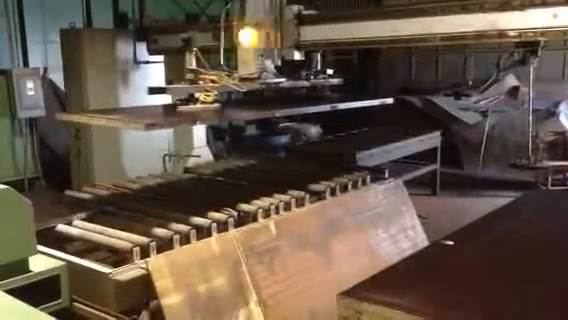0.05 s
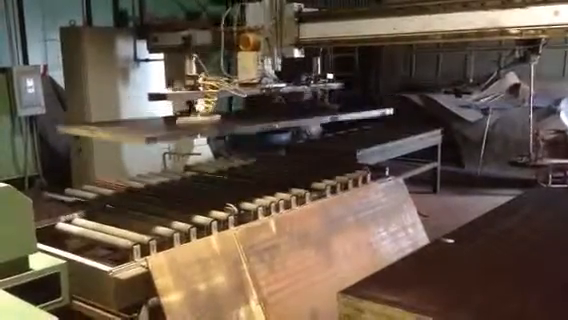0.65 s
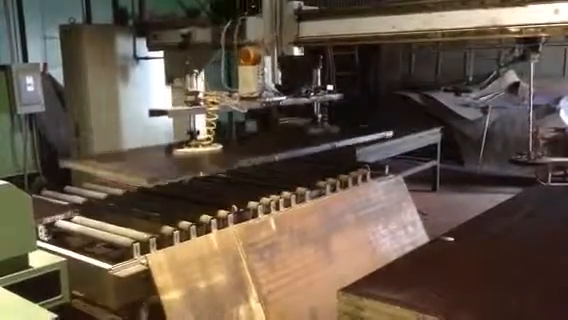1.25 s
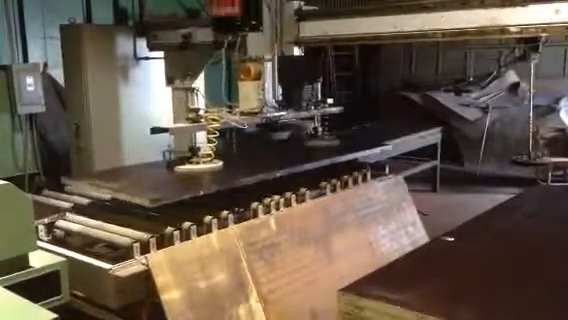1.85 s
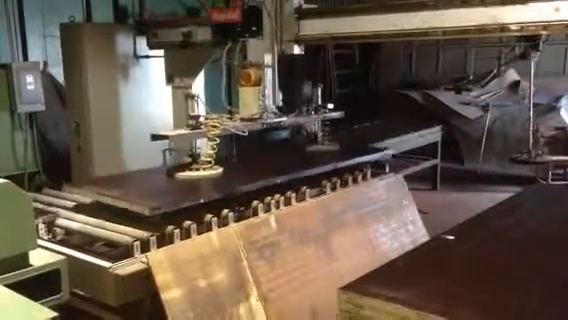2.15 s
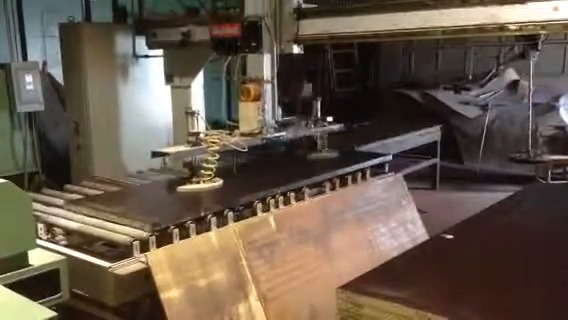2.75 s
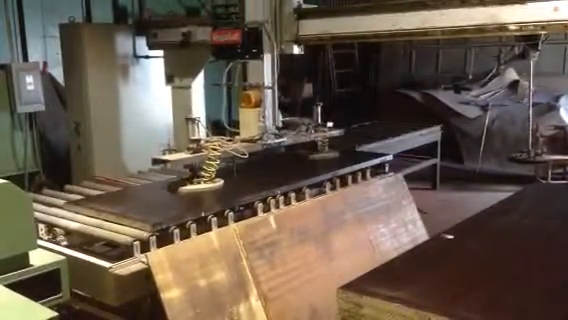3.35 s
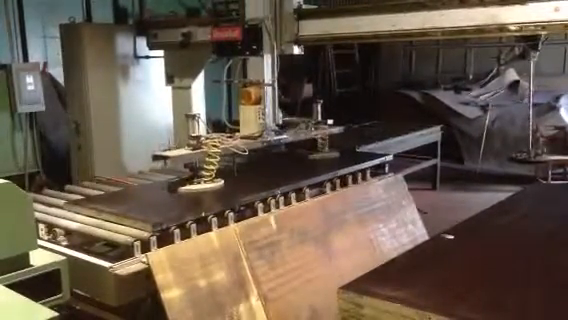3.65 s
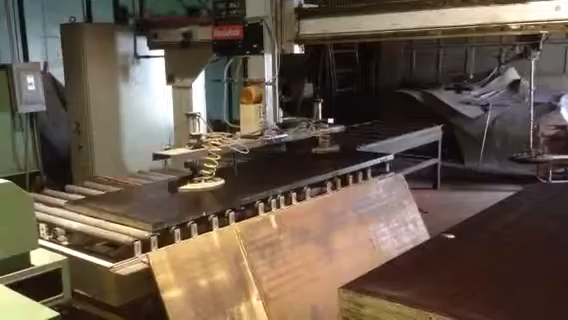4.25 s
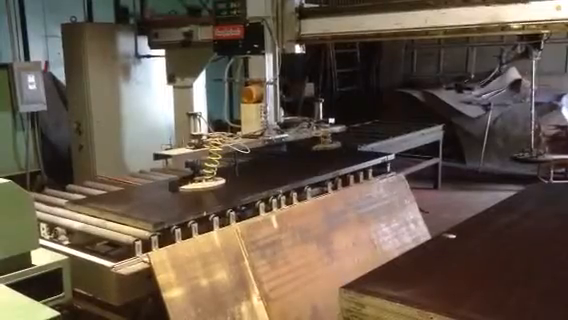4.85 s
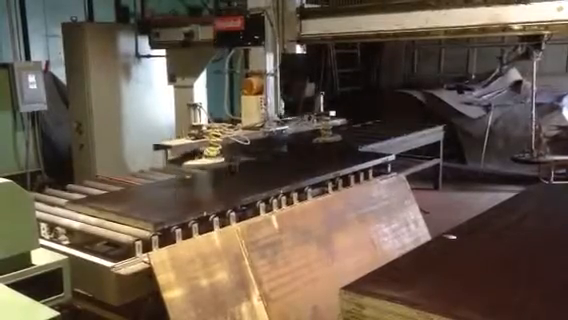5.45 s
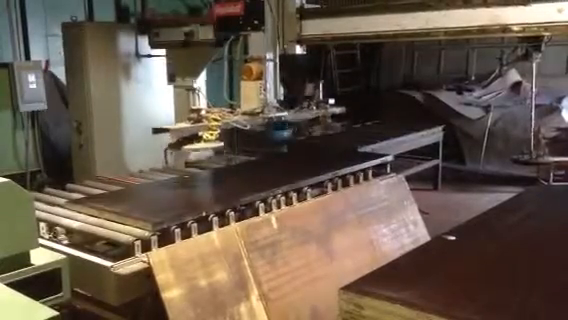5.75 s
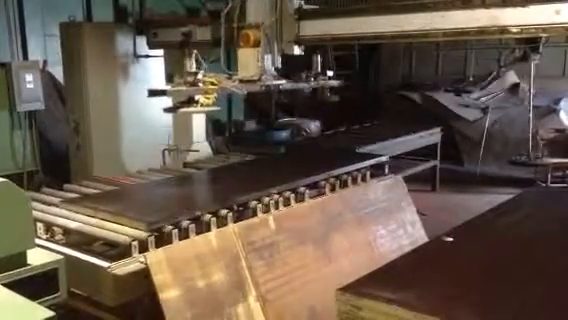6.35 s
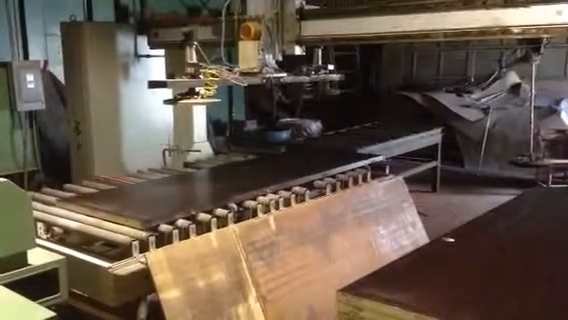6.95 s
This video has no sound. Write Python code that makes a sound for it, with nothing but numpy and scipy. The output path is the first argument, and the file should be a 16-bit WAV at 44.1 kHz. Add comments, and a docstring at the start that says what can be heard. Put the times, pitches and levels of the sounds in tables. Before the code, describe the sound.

A steady, bright hiss of compressed air from a vacuum lifter fills a factory hall, with motors and fans humming behind it. From 0.3 to 0.6 seconds valves spurt and the hiss surges, and the carriage starts rubbing downward. Around 0.9 seconds come another spurt, a thin metal squeak and a quick clatter. Soft knocks between 2.6 and 2.9 seconds mark a panel settling on a roller table. At about 4 seconds the hiss gives way to escaping air, which turns louder and brighter at 4.2 seconds, with hollow, sputtering whistles hopping in pitch. It ends in a sharp spurt and shuts off at 5.2 seconds, ringing in the hall for about a second. Machine hum remains while the carriage rises with a quiet rattle, a faint squeak at 6 seconds and small knocks. One microphone hears the knocks almost dry, its level dipping under each blast.

```python
"""A steady hiss of compressed air fills a factory hall, with motors and fans humming behind it.
It is the ejector of a vacuum lifter, which lowers a panel onto a roller table with knocks and squeaks.
The suction is released: air blows off and whistles through the cups, shuts off, and the carriage rises.
One microphone hears the knocks almost dry and the air with the hall ringing after it.
The recorder's gain control ducks under each blast and creeps back."""
import sys
import numpy as np
from scipy import signal
from scipy.fft import rfft, irfft
from scipy.io import wavfile
from scipy.ndimage import uniform_filter1d

SR = 44100
rng = np.random.default_rng(int(sys.argv[2]) if len(sys.argv) > 2 else 0)


def materialize(psi):
    """Save the field psi as 16-bit PCM at rate SR to the path in sys.argv[1].

    A 1-D psi becomes a single channel; in a 2-D psi each row is a channel.
    """
    bounded = np.clip(np.atleast_2d(psi).T, -1, 1)
    quanta = np.round(bounded * 32767).astype(np.int16)
    wavfile.write(sys.argv[1], SR, quanta)


N = 317520
TIME = np.arange(N) / SR
CUTOFF_HZ = 15280


def from_db(db):
    """Decibels to gain."""
    return 10 ** (np.asarray(db) / 20)


def rms_one(x):
    """Scale to unit power."""
    return x / np.sqrt(np.mean(x ** 2) + 1e-20)


def at_hz(points, hz):
    """Read a table along a log-frequency axis."""
    known_hz, values = np.transpose(points)
    return np.interp(np.log(hz + 1), np.log(known_hz), values)


def filtered(x, response):
    """Pass x through a gain given as a function of frequency."""
    return irfft(rfft(x) * response(np.fft.rfftfreq(len(x), 1 / SR)), len(x))


def drift(rate_hz):
    """Random wandering of spread 1, mostly slower than the rate."""
    return rms_one(filtered(rng.standard_normal(N), lambda hz: 1 / (1 + (hz / rate_hz) ** 2)))


def noise(spectrum, peaks=()):
    """Turbulence with a broad colour and narrow resonances on top; rms 1."""
    def colour(hz):
        resonances = sum(from_db(db) ** 2 / (1 + (2 * (hz - centre) / width) ** 2)
                         for centre, width, db in peaks)
        return from_db(at_hz(spectrum, hz)) * np.sqrt(1 + resonances) * (hz < CUTOFF_HZ)
    return rms_one(filtered(rng.standard_normal(N), colour))


def airy_tone(hz, width_hz):
    """Turbulence in one narrow resonance, whose pitch may move; rms 1."""
    turbulence = drift(width_hz) + 1j * drift(width_hz)
    return np.real(turbulence * np.exp(2j * np.pi * np.cumsum(hz * np.ones(N)) / SR))


def envelope(start, end, rise_s, fall_s):
    """Rise from the start, hold until the end, then fall to nothing."""
    return np.clip((TIME - start) / rise_s, 0, 1) * np.clip(1 - (TIME - end) / fall_s, 0, 1)


def arch(start, length):
    """Swell and fade in one half sine."""
    return np.sin(np.pi * np.clip((TIME - start) / length, 0, 1))


def ejector(level_db=-13, release_at=3.975, bleed_s=0.029, waver_db=0.64):
    """The venturi jet hisses through its silencer until the release, then its line bleeds empty."""
    # Colour of the hiss. Each row: frequency in Hz, level in dB.
    spectrum = [(300, -38), (950, -19.5), (1500, -11.5), (2100, -3.5), (2900, -4.5), (3350, -3),
                (3700, -0.5), (4400, 0.05), (5500, 1.6), (5780, -2.5), (7000, -5), (7700, -5.5),
                (10400, -5.5), (11300, -8.5), (12400, -7), (15200, -8)]
    # Its resonances. Each row: centre in Hz, width in Hz, level in dB against the hiss.
    peaks = [(2120, 220, -1.5), (3700, 240, -10), (5380, 300, -7)]
    # Jumps in supply pressure. Each row: start and end in seconds, gain in dB, rise in seconds.
    surges = [(0.297, 0.663, 2.5, 0.09), (0.32, 0.36, 2.5, 0.025), (0.397, 0.49, 3.5, 0.025),
              (3.941, 3.979, 5, 0.014)]
    # Thin bands that slide as the lifter moves. Each row: start and length in seconds,
    # first and last pitch in Hz, level in dB against the hiss.
    slides = [(0, .55, 5400, 5350, -19), (.95, 0.9, 5530, 5250, -19), (1.0, 1.1, 3710, 3680, -27),
              (1.85, 1.2, 5170, 5700, -19), (2.95, .95, 3890, 3700, -17.5), (3.05, 1.0, 5540, 5250, -17.5)]
    supply = np.exp(-np.maximum(TIME - release_at, 0) / bleed_s)
    surge_db = sum(db * envelope(start, end, rise, fall_s=0.025) for start, end, db, rise in surges)
    bands = np.zeros(N)
    for start, length, from_hz, to_hz, db in slides:
        pitch_hz = np.interp(TIME, [start, start + length], [from_hz, to_hz])
        bands += from_db(db) * arch(start, length) * airy_tone(pitch_hz, width_hz=63)
    gain = supply * from_db(level_db + surge_db + waver_db * drift(rate_hz=7))
    return gain * (noise(spectrum, peaks) + bands)


def machines(rumble_db=-29, whirr_db=-29.5, waver_hz=2.33, waver_db=2.5):
    """Motors and fans around the hall: booming rumble, whirr and wavering tones."""
    # Colours of the rumble and the whirr. Each row: frequency in Hz, level in dB.
    rumble = [(22, -52), (50, -59), (95, -25), (125, -6), (175, 0), (300, -1), (380, -3), (450, -13.5),
              (800, -38)]
    whirr = [(240, -20.5), (400, -12), (432, -11), (465, -1), (621, -1.5), (690, -5.5), (791, -6),
             (994, -8.5), (1910, -6), (2920, -12), (5190, -12.5), (6610, -17), (15000, -28)]
    # Booming resonances. Each row: centre in Hz, width in Hz, level in dB against the rumble.
    booms = [(171, 30, -2), (208, 23, 2), (245.6, 7.2, 0.5), (305.7, 12.4, 3.5)]
    # Motor tones. Each row: pitch in Hz, level in dB.
    hum = [(473, -43.5), (635, -47.5), (808, -48.5), (932, -49.5), (1270, -52), (8000, -55)]
    out = from_db(rumble_db) * noise(rumble, booms) + from_db(whirr_db) * noise(whirr)
    for hz, db in hum:
        phase = 2 * np.pi * np.cumsum(hz + waver_hz * drift(rate_hz=5.6)) / SR
        out += np.sqrt(2) * from_db(db + waver_db * drift(rate_hz=5.4)) * np.sin(phase)
    return out


def blow_off(leak_hz=1400, treble_hz=10500, leak_share=0.64, swell_db_per_s=4.5, flutter_db=0.6):
    """Air escapes around the cups: low and dull while they sit on the panel, bright once they lift."""
    # Colour of the escaping air. Each row: frequency in Hz, level in dB.
    spectrum = [(300, -40), (900, -21.5), (1400, -12.5), (2100, 0), (2700, -2.5), (3500, -5), (4800, -4),
                (6000, -3), (7200, -2.5), (8500, -4), (10000, -4.5), (11300, -8), (13400, -9.5),
                (15000, -8)]
    # Resonances of the cups. Each row: centre in Hz, width in Hz, level in dB against the air.
    peaks = [(2160, 200, -21), (2700, 110, -3), (3050, 200, -7), (4860, 120, -3), (6900, 200, -3.5),
             (7660, 170, -10), (9100, 60, 2), (15000, 380, -1)]
    # Blasts. Each row: start and end in seconds, level in dB, treble gain in dB.
    blows = [(0.27, 0.574, -13, -8), (3.967, 4.214, -13.5, -6.5), (4.21, 5.183, -7, 1.5)]
    air = noise(spectrum, peaks)
    low = filtered(air, lambda hz: 1 / (1 + (hz / leak_hz) ** 6))
    body = filtered(air, lambda hz: 1 / (1 + (hz / treble_hz) ** 6))
    middle, treble = body - low, air - body
    out = np.zeros(N)
    for start, end, db, treble_db in blows:
        opening = envelope(start, end, rise_s=0.023, fall_s=0.003)
        swell_db = swell_db_per_s * (np.clip(TIME, start, end) - start)   # the gap widens as air runs
        hiss = low * from_db(-leak_share * treble_db) + middle + treble * from_db(treble_db)
        out += opening * from_db(db + swell_db) * hiss
    return from_db(flutter_db * drift(rate_hz=12)) * out


def valve_spurts():
    """A valve opens, vents a bright jet and snaps shut."""
    # Valves switching. Each row: start and length in seconds, level in dB,
    # opening and shutting times in seconds, treble roll-off in Hz.
    spurts = [(0.32, 0.13, -7.5, 0.12, .025, 14400), (0.434, 0.16, -10, .03, 0.035, 9600),
              (0.84, 0.12, -8, 0.045, .03, 7560), (3.935, 0.04, -15, 0.012, .01, 17200),
              (4.29, 0.14, -2.5, 0.045, 0.12, 17000), (5.038, 0.15, -1, 0.1, 0.0087, 16800),
              (7.167, 0.058, -20.5, .0006, .055, 16000)]
    # Colour of the jet. Each row: frequency in Hz, level in dB.
    spectrum = [(500, -30), (1300, -5), (2300, -1.5), (5000, 1), (7500, 4), (10000, 12.5), (12500, 8.5),
                (15200, 8.5)]
    out = np.zeros(N)
    for start, length, db, rise, shut, top_hz in spurts:
        opening = np.clip((TIME - start) / rise, 0, 1) * np.clip((start + length - TIME) / shut, 0, 1)
        jet = filtered(noise(spectrum), lambda hz: 1 / np.sqrt(1 + (hz / top_hz) ** 6))
        out += from_db(db) * opening * jet
    return out


def hoist(speed_up_s=0.25, brake_s=1.2, rattle_db=1.96):
    """The carriage rubs and rattles along its guides, louder the faster it runs."""
    # The run down, then up. Each row: start and onset of braking in seconds, level in dB.
    moves = [(.38, .83, -29.5), (5.35, 6.33, -30.5)]
    # Colour of the rubbing. Each row: frequency in Hz, level in dB.
    spectrum = [(60, -33), (150, 2), (280, -10), (550, -1), (1000, -3.5), (1500, -1.5), (2050, 3.5),
                (2800, -6), (4800, -7.5), (7000, -15), (14000, -27)]
    travel = sum(from_db(db) * envelope(start, end, speed_up_s, brake_s) for start, end, db in moves)
    return travel * from_db(rattle_db * drift(rate_hz=14)) * noise(spectrum)


def cup_whistle(rise_s=0.017, fall_s=0.012, sputter_db=2.0):
    """The jet sounds the hollow of the cups: short, sputtering notes that hop between its resonances."""
    # Hollow notes. Each row: start and end in seconds, pitch in Hz, level in dB.
    notes = [(0.548, 0.572, 2190, -16), (4.03, 4.3, 1200, -33.5), (4.08, 4.24, 2530, -23.5),
             (4.21, 4.3, 3010, -19), (4.252, 4.342, 2550, -13), (4.28, 4.35, 2270, -15),
             (4.495, 4.538, 2535, -12), (4.535, 4.673, 2300, -19.5), (4.55, 5.173, 2078, -21),
             (4.576, 4.7, 2620, -16), (4.687, 4.872, 2094, -18), (4.84, 5.178, 2285, -16),
             (4.86, 4.9, 2750, -12), (4.947, 5.0, 2560, -14.5)]
    whistle = sum(from_db(db) * envelope(start, end, rise_s, fall_s) * airy_tone(hz, width_hz=49)
                  for start, end, hz, db in notes)
    return whistle * from_db(sputter_db * drift(rate_hz=20))


def rod_squeaks():
    """Metal sliding on the guide rods sings one pitch for an instant."""
    # Squeaks. Each row: start in seconds, pitch in Hz, level in dB, length in seconds.
    squeaks = [(0.898, 4960, -18.5, 0.03), (0.905, 7860, -7, 0.013), (0.929, 7800, -12, 0.017),
               (5.998, 7400, -28, .028), (5.999, 5270, -26, 0.033), (6.243, 4540, -40.5, 0.032)]
    return sum(from_db(db) * arch(start, length) * np.sin(2 * np.pi * hz * TIME)
               for start, hz, db, length in squeaks)


def knocks(band_ratio=1.35):
    """Each contact of carriage and panel shakes a dense cluster of damped modes around its own pitch."""
    # Contacts. Each row: start in seconds, level in dB, centre in Hz, seconds to fall 60 dB.
    contacts = [(0.907, -15, 1150, 0.26), (0.911, -17, 2400, 0.13), (0.933, -20, 1300, 0.3),
                (0.955, -20, 1920, 0.47), (1.46, -28, 856, 0.2), (2.655, -24, 980, 0.28),
                (2.684, -20, 720, 0.17), (2.864, -24.5, 288, 0.49), (2.905, -26, 650, 0.41),
                (3.945, -26, 1010, 0.37), (4.18, -31, 595, 0.27), (6.0, -29, 940, 0.18),
                (6.85, -29, 1740, 0.61)]
    out = np.zeros(N)
    for start, db, hz, t60 in contacts:
        band = signal.butter(2, [hz / band_ratio, hz * band_ratio], "band", fs=SR, output="sos")
        cluster = rms_one(signal.sosfilt(band, rng.standard_normal(N)))
        decay_db = 60 * np.clip((TIME - start) / t60, 0, 2)
        out += cluster * (TIME >= start) * from_db(db - decay_db)
    return out


def hall_tail(build_s=0.0046, absorb_hz=13000):
    """One second of diffuse echoes from an impulse: the air swallows the top, and the treble dies first."""
    # Ring of the hall. Each row: frequency in Hz, seconds to fall 60 dB.
    ring_times = [(200, 4), (2000, 0.86), (4500, 1.2), (7500, 1), (10500, 0.59), (14500, 0.49)]
    t = TIME[:SR]
    edges_hz = np.geomspace(100, 17000, 36)
    white = rng.standard_normal(SR)
    tail = np.zeros(SR)
    for low, high in zip(edges_hz, edges_hz[1:]):
        band = filtered(white, lambda hz: ((hz >= low) & (hz < high)) / np.sqrt(1 + (hz / absorb_hz) ** 4))
        t60 = at_hz(ring_times, np.sqrt(low * high))
        tail += band * from_db(-60 * t / t60)
    tail *= 1 - np.exp(-t / build_s)
    return tail / np.linalg.norm(tail)


def hall(x, wet_db):
    """Direct sound plus the hall, whose echo pattern shifts as the lifter moves; the power is kept."""
    angle = 2 * np.pi * TIME / TIME[-1]
    crossfades = np.cos(angle), np.sin(angle)
    echoes = sum(signal.fftconvolve(x * fade, hall_tail())[:N] for fade in crossfades)
    wet = from_db(wet_db)
    return (x + wet * echoes) / np.hypot(1, wet)


def scene():
    """The lifter in the hall, heard at one microphone that feeds both channels."""
    air = hall(ejector() + blow_off() + valve_spurts(), wet_db=-6.5) + hall(cup_whistle(), wet_db=-6.0)
    contacts = hall(knocks() + hoist(), wet_db=-22.0) + hall(rod_squeaks(), wet_db=-9.0)
    return np.tile(air + contacts + machines(), (2, 1))


def gain_control(x, threshold_db=-15.0, attack_s=0.045, release_s=1.71, first_cut_db=4.5, hop=220):
    """Whatever exceeds the threshold is turned down quickly; the gain returns slowly."""
    power = uniform_filter1d(x[0] ** 2, 2 * hop)[::hop]
    level_db = 10 * np.log10(power + 1e-12)
    cut_db, cuts = first_cut_db, []
    for excess_db in np.maximum(level_db - threshold_db, 0):
        lag_s = attack_s if excess_db > cut_db else release_s
        cut_db += (excess_db - cut_db) * (1 - np.exp(-hop / SR / lag_s))
        cuts.append(cut_db)
    return x * from_db(-np.interp(TIME, TIME[::hop], cuts))


def record(dry, low_cut_hz=60, makeup_db=0.69, ceiling=0.75):
    """Behind the microphone: low cut, gain control, rounding of the highest peaks and a steep top cut."""
    thinned = signal.sosfilt(signal.butter(2, low_cut_hz, "high", fs=SR, output="sos"), dry)
    levelled = from_db(makeup_db) * gain_control(thinned)
    rounded = levelled / (1 + (levelled / ceiling) ** 6) ** (1 / 6)
    return signal.sosfilt(signal.ellip(12, .1, 80, CUTOFF_HZ, fs=SR, output="sos"), rounded)


dry = scene()
out = record(dry)
materialize(out)
```